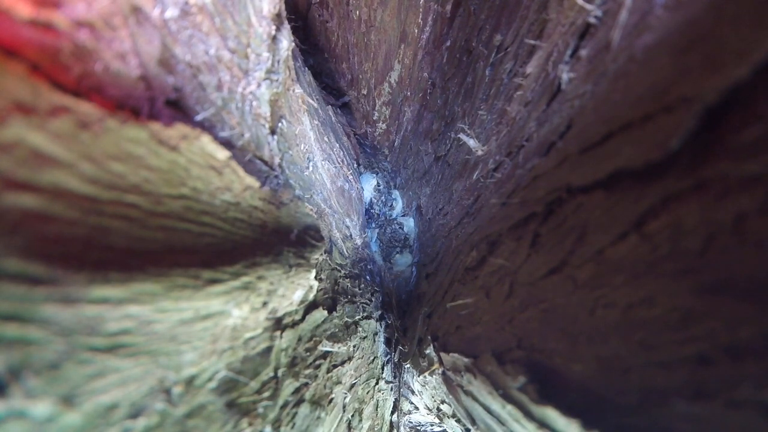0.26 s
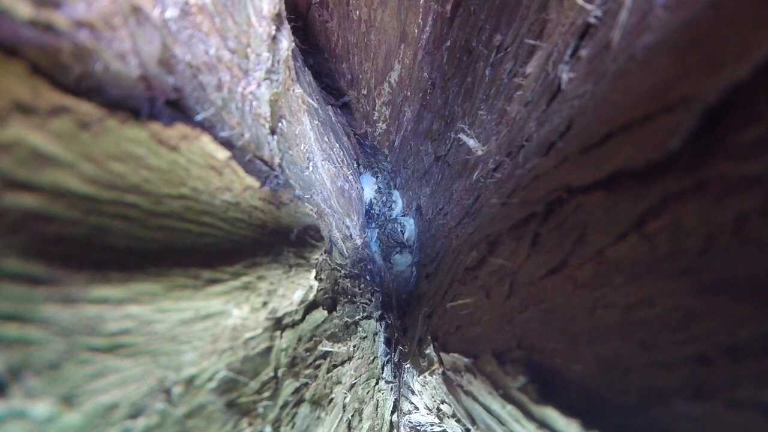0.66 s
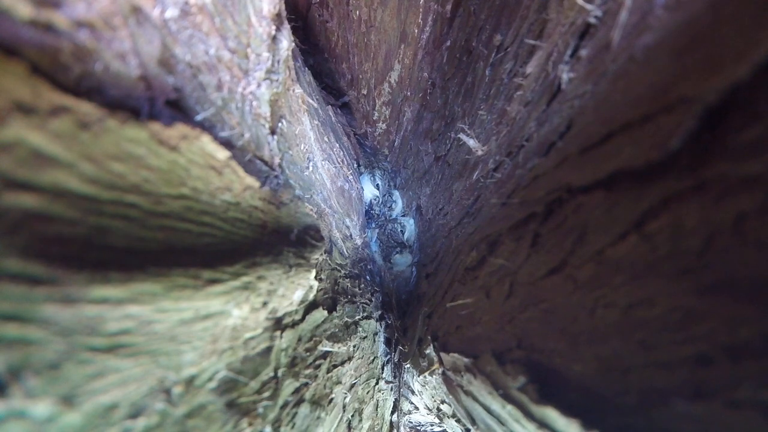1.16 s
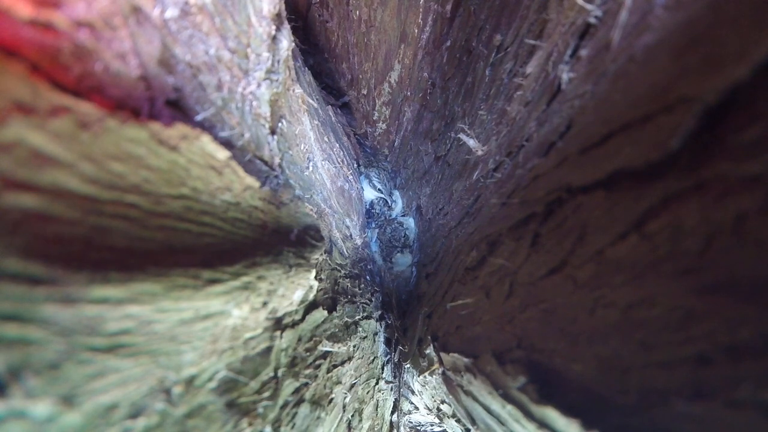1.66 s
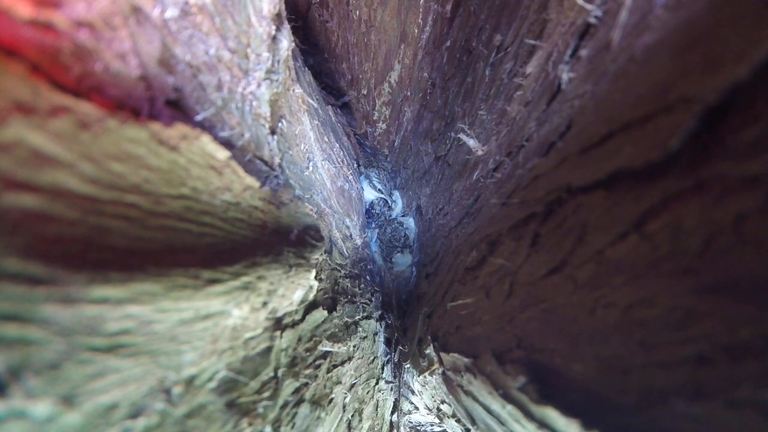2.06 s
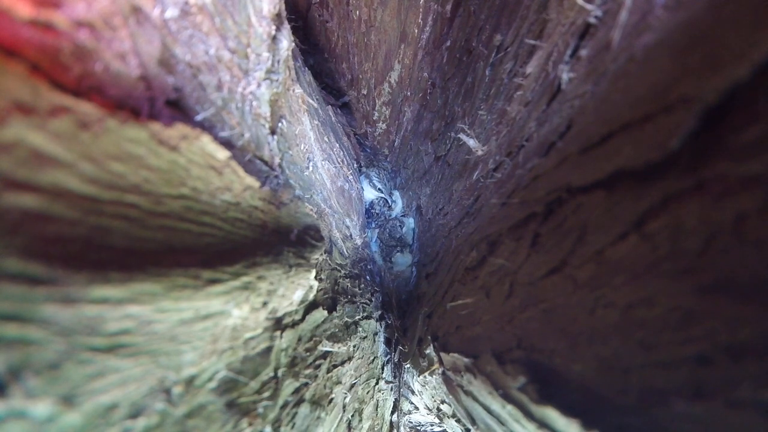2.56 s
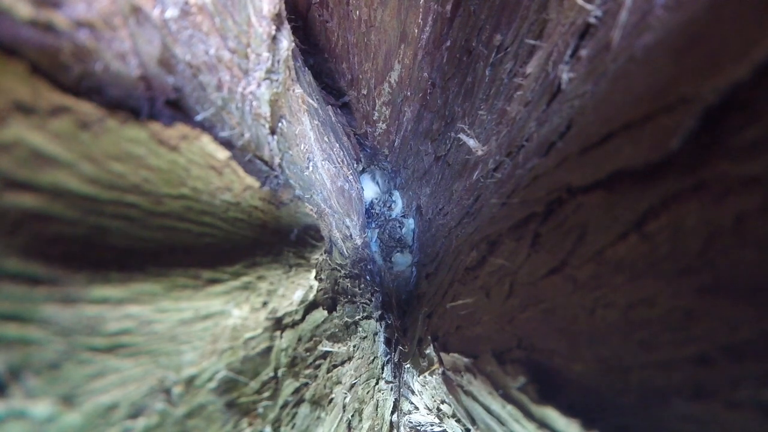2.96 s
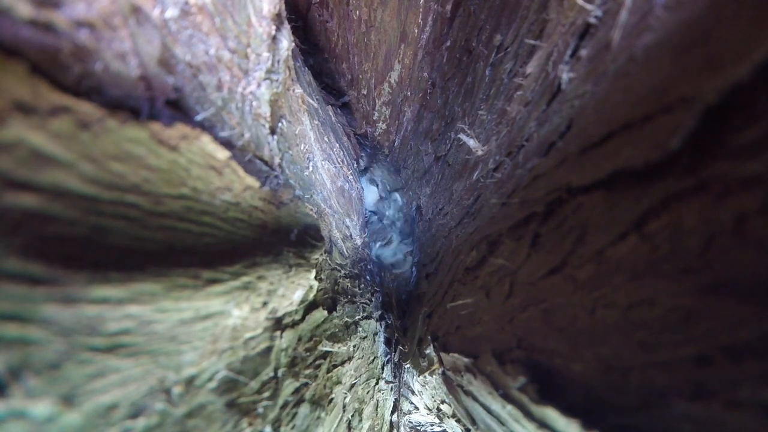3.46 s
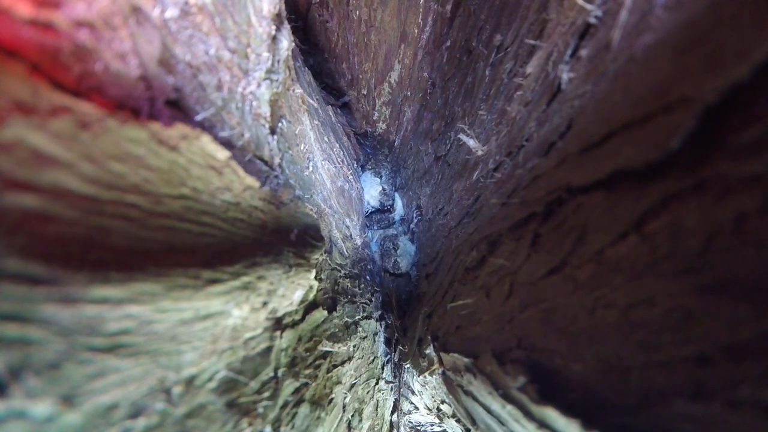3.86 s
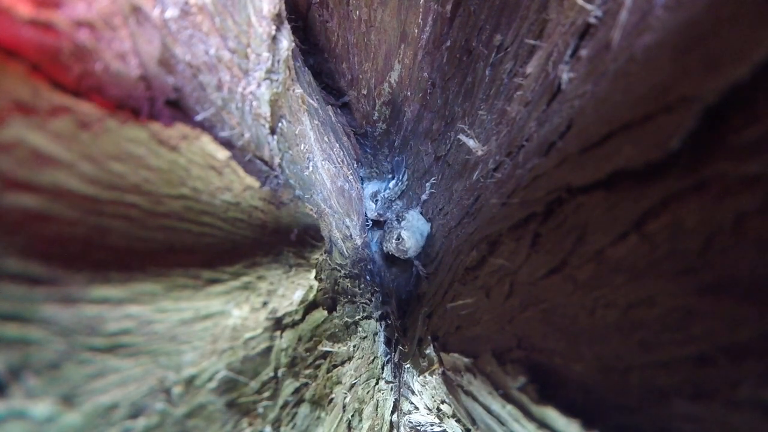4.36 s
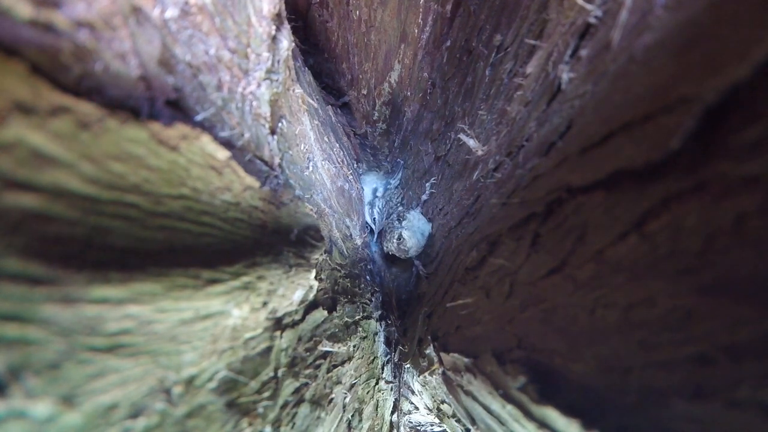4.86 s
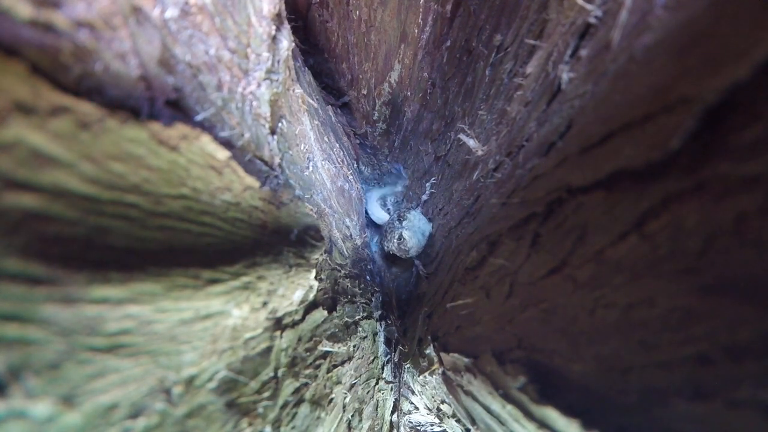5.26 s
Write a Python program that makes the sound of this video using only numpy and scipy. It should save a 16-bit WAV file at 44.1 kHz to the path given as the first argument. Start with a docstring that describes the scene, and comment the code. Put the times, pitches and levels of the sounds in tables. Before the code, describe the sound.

A quiet woodland hush with a faint, wavering low drone and distant whistling songbirds. Close up, claws tick on bark at 0.1 s and a thin begging call near 7 kHz quivers from 0.2 to 0.5 s. At about 0.95 s a nearer bird chips and swoops downward; a loud, pulsing begging call follows at 1.1 s, with soft dull bumps and low gusts until 2 s. More throbbing calls break into pips at 1.5, 2.1 and 2.5-2.9 s, as dry scratches grow denser from 2.4 s. At 3.5 s wings flutter against the microphone with sharp wooden knocks, then short bright squeals at 3.65 s. A stronger flurry thumps at 4.13-4.3 s. Calls become faint, nest lining rustles and ticks, a crisp scratch snaps at 4.8 s, a far bird trills quickly upward from 4.83 to 5.5 s, and wings and knocks return around 5.45 s.

```python
"""Woodland hush, a low wavering drone and far songbirds open: filtered noise, a sine and gliding whistles.
Claws soon scratch bark in noise bursts; treecreeper nestlings beg in a cleft of a tree, thin whistles
near 7 kHz that throb, often into pips. At 1 s a nearer bird chips and swoops; soft bumps and gusts follow.
From 3.5 s the parent flutters its wings close to the microphone and knocks against the wood (brushed noise,
air pulses, housing rings); smooth squeals greet the food, then the lining rustles more and a far bird trills."""
import sys
import numpy as np
from scipy import signal
from scipy.fft import rfft, irfft, next_fast_len
from scipy.io import wavfile
from scipy.ndimage import uniform_filter1d, map_coordinates

SR = 44100
rng = np.random.default_rng(int(sys.argv[2]) if len(sys.argv) > 2 else 0)


def store_pcm(level_fs):
    """Save levels as 16-bit WAV."""
    pcm = np.round(np.clip(level_fs, -1, 1) * 32767).astype(np.int16)
    wavfile.write(sys.argv[1], SR, np.atleast_2d(pcm).T)


N = 242991

# Noise colours. Each row: frequency in Hz, relative density in dB; the noise is then scaled to rms 1.
HUSH_SPECTRUM = [(60, -4), (160, -13), (290, -10.5), (600, -21.5), (1120, -13), (1500, -24.5),
                 (2050, -21.5), (3000, -29.5), (5500, -32.5), (6600, -22.5), (8200, -30.5), (9600, -43.5),
                 (12500, -34.5), (15000, -64)]
RUMBLE_SPECTRUM = [(12, -4.5), (28, -0.5), (55, -1), (90, -12.5), (180, -26), (500, -71)]
RUSTLE_SPECTRUM = [(120, -3.5), (200, -20.5), (290, -2), (400, -14), (480, -10), (700, -24), (2000, -20.5),
                   (3000, -24.5), (6500, -25.5), (9000, -33), (13000, -66.5)]
BARK_SPECTRUM = [(1200, -18.5), (2300, -28), (3200, -6), (4600, 2.5), (5500, -0.5), (6500, 10), (7400, -7),
                 (9000, -17), (12500, -28), (15000, -50.5)]
KNOCK_SPECTRUM = [(100, -36), (300, 7.5), (700, -9), (1200, -4.5), (2300, 0.5), (3800, -10), (8000, -60)]
FEATHER_SPECTRUM = [(60, -2), (125, 6), (185, -15), (285, 3.5), (380, -2.5), (470, 0), (750, -21),
                    (1250, -8), (1550, -14), (2200, -13), (3300, -20), (5100, -22.5), (6400, -18.5),
                    (7600, -33), (9000, -38), (14000, -55)]

# Stirring air, growing as the parent comes near. Each row: time in seconds, level in dB before layer gains.
STIRRING_AIR = [(0, -74), (2.3, -68), (2.9, -54), (3.8, -51.5), (4.45, -46.5), (5.5, -44)]
# Gusts on the microphone. Each row: start in seconds, length in seconds, level in dB before layer gains.
GUSTS = [(1.095, 0.41, -46.5), (1.487, 0.23, -47.5)]
GUST_ATTACK_S, GUST_FADE_DB = 0.016, 17.5
# Litter shaken by each flutter. Each row: middle in seconds, level in dB before layer gains.
LITTER_SHAKES = [(3.55, -54), (4.215, -48), (5.48, -49)]
SHAKE_SIGMA_S = 0.098
JOSTLE_START_S, JOSTLE_DB = 4.3, -60  # after the feed the chicks keep shifting in the lining
# Far drone's pitch. Each row: time in seconds, frequency in Hz.
DRONE_PITCH = [(0, 101.4), (.35, 97.5), (.55, 83.4), (.8, 107.2), (1.1, 88), (1.5, 93), (1.72, 70.5),
               (2, 93.2), (2.3, 81.3), (2.7, 89.3), (3.2, 82.1)]
# Far drone's level, in the end receding. Each row: time in seconds, level in dB.
DRONE_LEVEL = [(0, -59.5), (1.2, -57.5), (2.4, -58), (3.6, -63)]

# Far songbirds' notes, levels before the distance gain.
# Each row: start in seconds, length in seconds, pitch in Hz, slide in Hz, level in dB.
SONG_NOTES = [(0, 0.148, 2110, 140, -54), (0.217, 0.12, 2510, 567, -61.5), (0.32, 0.11, 5200, -220, -63),
              (0.379, .03, 2720, 250, -60), (0.472, 0.1, 2300, -20, -64), (0.521, .2, 3580, -280, -64.5),
              (0.748, .1, 2010, 21, -61), (0.641, 0.25, 2564, 190, -61.5),
              (0.917, 0.043, 2420, -300, -55.5), (0.956, 0.093, 2080, 244, -53.5),
              (1.3, 0.13, 1854, -40, -62), (1.504, 0.15, 3470, -47, -66), (2.572, 0.043, 4664, -380, -44),
              (2.617, 0.24, 4335, 58.5, -55), (2.79, 0.15, 5780, 154, -58.5), (2.989, .08, 2140, -100, -62),
              (3.002, .06, 5820, 148, -60), (3.12, 0.085, 5700, 79, -57.5), (3.139, 0.079, 1823, -77, -57),
              (3.288, 0.105, 5660, 160, -58), (3.43, .06, 5590, 50, -58), (3.8, .08, 4190, -22, -60),
              (3.874, 0.0077, 3730, -190, -47.5), (3.999, 0.076, 4070, 30, -63),
              (4.302, 0.024, 3740, -280, -49.5), (4.326, 0.18, 2143, -210, -54),
              (4.376, 0.013, 4200, -400, -50), (4.421, 0.026, 3620, -200, -51),
              (4.434, 0.03, 4940, -950, -46), (4.609, 0.054, 6690, -1500, -53),
              (4.646, 0.6, 2308, -78.5, -61.5), (5.075, 0.08, 2436, 25, -56.5)]
NOTE_HOLD_SHARE, NOTE_FADE_DB = 0.26, 7.5  # a note holds for this share of its length, then fades
# Two runs of one slur, falling in pitch, levels before the distance gain.
# Each row: start in seconds, period in seconds, slur length in seconds, level in dB.
SLUR_RUNS = [(0.717, .157, .086, -57), (2.87, .1665, .043, -53)]
# Shape of the slur. Each row: share of its length, pitch in Hz, level in dB against its run.
SLUR_SHAPE = [(0, 6150, -16), (.62, 5230, 1), (.82, 4490, 7), (1, 4060, -7)]
TRILL_START_S, TRILL_PERIOD_S = 4.829, .0703

# Claw catches on bark. Each row: time in seconds, level in dB, knock in dB against that level,
# length in seconds of a 30 dB decay, count of light slips on either side.
CLAW_CATCHES = [(0.133, -36, -22, 0.007, 0), (.208, -38.5, -20, 0.011, 0), (.6314, -46, -4, 0.015, 0),
                (1.6872, -34, -30, .023, 2), (1.941, -46, -24, .018, 0), (1.9635, -42.5, -28, 0.019, 0),
                (1.982, -31.5, -15, 0.015, 0), (2.3454, -42.5, -10.5, .02, 0), (2.388, -44, -22, 0.026, 0),
                (2.401, -28.5, -20, 0.02, 1), (2.621, -42, -25, 0.014, 0), (2.636, -39.5, -25, .012, 0),
                (2.676, -34.5, -16, 0.038, 0), (2.692, -28, -24, .012, 1), (2.702, -36.5, -21, 0.011, 0),
                (2.748, -32.5, -22, 0.011, 0), (2.9604, -26.5, -12, 0.013, 0),
                (2.9696, -27.5, -12, 0.018, 1), (3.169, -42.5, -22, .02, 0), (3.211, -38, -18, 0.047, 0),
                (3.274, -43, -20, 0.015, 0), (3.4843, -31, 2, 0.0095, 0), (3.490, -31.5, -4, 0.016, 0),
                (3.506, -38, -9, 0.032, 0), (3.55, -25, -7, 0.015, 0), (3.572, -33, -16, 0.017, 0),
                (3.5785, -26, -18, 0.0092, 0), (3.589, -41.5, -14, 0.058, 0), (3.6165, -36, -10, 0.035, 0),
                (3.643, -43, 2, 0.028, 0), (3.666, -33, -27, 0.015, 0), (3.7052, -32.5, -6.5, 0.025, 0),
                (3.738, -36, -25, .008, 0), (3.993, -32.5, -25, 0.0091, 0), (4.111, -34, -22, 0.014, 0),
                (4.121, -30.5, -27, .012, 0), (4.124, -31, -17, .014, 0), (4.265, -36, 5, 0.011, 0),
                (4.295, -33, -16, 0.0097, 0), (4.3, -32, -16, 0.012, 0), (4.4807, -35.5, -8.5, 0.028, 1),
                (4.792, -20, -22, .009, 0), (4.808, -33.5, -9.5, 0.024, 0), (4.89, -42, -14, .02, 1),
                (5.088, -38, -8, .014, 0), (5.121, -37, -8, 0.017, 0), (5.359, -35, -18, 0.012, 0)]
SLIP_GAP_S, SLIP_SCATTER_SHARE, SLIP_DB = 0.015, 0.089, -13.5  # level is against the catch
# Loose bark flakes flicked by a claw. Each row: time in seconds, pitch in Hz, level in dB.
BARK_FLAKES = [(.137, 4200, -41), (2.403, 4750, -30), (2.973, 2500, -37), (3.487, 2400, -36),
               (4.811, 2000, -39), (5.089, 1130, -36)]

# Begging calls. Each row: start in seconds, end in seconds, throb period in seconds, pitch in Hz,
# pitch fall in Hz, level in dB, swell in seconds, fade in dB, pitch swing in Hz,
# place of the pitch crest in a throb from 0 to 1, first choke, last choke; over 1 leaves silent gaps.
BEGGING_CALLS = [ (.195, .545, 0.038, 7200, 416, -39, .08, -4, 176, .85, .12, 2.22),
                 (1.011, 1.126, 0.032, 7420, -84.5, -41, .0045, -2.5, 220, 0.8, 0.6, 0.9),
                 (1.110, 1.324, .034, 7455, 90, -26.6, .008, 5, 150, .75, .3, 2.6),
                 (1.292, 1.407, .029, 8060, 201, -46, .015, 7, 100, .5, 6.5, 6.5),
                 (1.484, 1.792, 0.04, 7210, 302, -39, 0.046, 2, 170, 0.92, .046, 0.56),
                 (2.068, 2.284, 0.036, 7260, 254, -37.5, .003, 2.5, 300, .78, 1.1, 6.5),
                 (2.521, 2.882, 0.041, 7140, 483, -41, .055, 7.5, 202, 0.8, 0.18, 4.7),
                 (2.58, 2.629, 0.042, 7420, -59, -38, .012, 6, 100, 0.73, .2, .5),
                 (2.627, 2.930, .0345, 7420, 100, -27.3, .008, 8.5, 170, .78, .1, 3.8),
                 (3.135, 3.201, 0.032, 7800, 52, -54.5, .004, -4, 98.5, 0.7, 6.2, 1.4),
                 (3.204, 3.431, 0.032, 7943, 228, -36, 0.045, 9.5, 150, 0.37, 1.25, 1.6),
                 (3.301, 3.547, .031, 7600, 400, -45.5, 0.097, 7.5, 600, 0.69, 0.4, 1.1),
                 (3.866, 4.148, 0.034, 7250, 450, -44.5, 0.11, 9, 725, 0.85, .65, 0.74),
                 (4.290, 4.481, 0.036, 7200, 389, -62.5, 0.015, -14.5, 520, 0, 0.49, 1),
                 (5.040, 5.385, 0.032, 7170, 560, -57, 0.11, -4.5, 523, .05, 0.59, 1.24), ]
SWELL_DB, FALL_POWER, FADE_POWER = 17.5, 2.3, 2.54  # powers above 1: fall and fade speed up

# Nearer bird's chip. Each row: time in seconds, pitch in Hz, level in dB.
NEAR_CHIP = [(.941, 5750, -50), (.948, 6300, -48), (.959, 6400, -37.5), (.965, 6080, -50),
             (.981, 6050, -52), (.988, 5460, -53)]
# Its swoops, one list a note. Each row: time in seconds, pitch in Hz, level in dB.
NEAR_SWOOPS = [
    [(1.001, 5540, -60), (1.008, 5750, -53), (1.014, 5550, -56)],
    [(1.014, 5030, -57), (1.021, 4110, -46.5), (1.027, 4200, -47.5), (1.034, 4850, -53), (1.040, 5730, -61)],
    [(1.042, 5200, -56), (1.048, 4070, -45.5), (1.054, 3235, -54), (1.066, 3260, -46), (1.074, 3080, -46),
     (1.084, 3000, -50), (1.110, 2540, -58)],
]
# Soft bumps on the microphone's housing. Each row: time in seconds, level in dB.
HOUSING_BUMPS = [(1.113, -49), (1.178, -44), (1.199, -40.5), (1.487, -47), (1.54, -46), (1.575, -40.5),
                 (1.615, -41.5), (1.665, -44.5), (1.995, -44)]

# Wing strokes. Each row: time in seconds, swish in dB, air push in dB, swish sigma in seconds.
WING_STROKES = [(3.489, -44.5, -47, .005), (3.508, -46, -40, .005), (3.528, -39, -46, 0.0076),
                (3.556, -32.5, -33, 0.0032), (3.577, -46.5, -48, 0.0049), (4.13, -38.5, -46, 0.0022),
                (4.141, -38, -32.5, 0.0019), (4.167, -32, -51, 0.0019), (4.1772, -27, -23, 0.0038),
                (4.196, -35, -45, 0.0028), (4.212, -27, -25, 0.0046), (4.251, -30.5, -22, 0.0055),
                (4.29, -39.5, -31, 0.0044), (5.295, -42, -33, 0.0043), (5.431, -35, -35, .004),
                (5.451, -36, -42, 0.0016), (5.461, -26, -30, 0.0033), (5.482, -35, -44, 0.0032),
                (5.497, -26, -28.5, 0.004)]
# Short damped resonances of the microphone's housing, rung by strokes and taps.
# Each row: frequency in Hz, relative level in dB, t60 in seconds.
HOUSING_MODES = [(285, -16, 0.052), (463, -11.5, 0.024), (774, -8, 0.0096), (1273, -10, 0.011),
                 (2250, 0.5, 0.0026), (3440, -5, 0.0021)]
# Parent's sharp bumps against the wood. Each row: time in seconds, peak of the ring in dB.
WOOD_TAPS = [(3.520, -30), (3.5545, -17), (3.5797, -29), (4.1635, -26), (4.2145, -17), (4.253, -24),
             (4.7938, -29), (5.4605, -22), (5.499, -24)]
# Squeals as the food arrives. Each row: start in seconds, length in seconds, first pitch in Hz,
# middle pitch in Hz, last pitch in Hz, level in dB.
FOOD_SQUEALS = [(3.648, 0.025, 6900, 7910, 8170, -22.5), (3.657, .045, 6560, 7800, 7970, -27),
                (3.706, 0.022, 7600, 7460, 7520, -33.5), (4.484, 0.063, 6520, 5850, 5560, -44.5),
                (5.372, 0.0078, 6750, 6480, 6350, -39.5), (5.393, 0.013, 6500, 6300, 5900, -39.5)]
SQUEAL_EDGE_DB = -7  # ends against the middle

# Decay of the woods' echo. Each row: frequency in Hz, t60 in seconds.
WOODS_DECAY = [(500, 0.22), (4000, 0.58), (9000, 0.1)]
NEST_ECHO_DB = -35
TOP_HZ = 14200


def amp(db):
    """Decibels to gain."""
    return 10 ** (np.asarray(db) / 20)


def unit(x):
    """Scale to rms 1."""
    return x / np.sqrt(np.mean(x ** 2) + 1e-20)


def along(points, hz):
    """Interpolate (Hz, value) points on a log frequency axis."""
    f, v = np.transpose(points)
    return np.interp(np.log(hz + 1), np.log(f + 1), v)


def curves(rows, t):
    """Each column after the time, interpolated at times t."""
    s, *cols = np.transpose(rows)
    return [np.interp(t, s, c) for c in cols]


def span(rows):
    """Sample times from the first row to the last, at least 5 ms."""
    return np.arange(rows[0][0], max(rows[-1][0], rows[0][0] + .005), 1 / SR)


def wobble(rate_hz, t):
    """A smooth random curve with rate_hz knots a second."""
    knots = rng.standard_normal(int(N * rate_hz / SR) + 4)
    return map_coordinates(knots, [t * rate_hz], mode="nearest")


def filtered(x, response):
    """Apply a zero-phase gain, a function of frequency in Hz."""
    m = next_fast_len(N + SR // 4)
    return irfft(rfft(x, m) * response(np.fft.rfftfreq(m, 1 / SR)), m)[:N]


def noise(spectrum):
    """Coloured noise of rms 1."""
    return unit(filtered(rng.standard_normal(N), lambda hz: amp(along(spectrum, hz))))


def add(track, s, sound):
    """Mix a sound in at s seconds."""
    start = int(np.clip(round(s * SR), 0, N))
    track[start:start + len(sound)] += sound[:N - start]


def whistle(t, hz, gain, jitter_hz, flutter_db):
    """A syrinx sings one nearly pure line, slightly unsteady in pitch and strength."""
    phase = 2 * np.pi * np.cumsum(hz + jitter_hz * wobble(220, t)) / SR
    edge = np.clip(np.minimum(t - t[0], t[-1] - t) / 0.0016, 0, 1)
    soft = uniform_filter1d(gain * edge, size=64, mode="constant")
    return np.sqrt(2) * soft * amp(flutter_db * wobble(160, t)) * np.sin(phase)


def glides(notes, jitter_hz, flutter_db):
    """Whistled notes that slide through their pitches and levels."""
    out = np.zeros(N)
    for note in notes:
        t = span(note)
        hz, db = curves(note, t)
        add(out, t[0], whistle(t, hz, amp(db), jitter_hz, flutter_db))
    return out


def stirring_air(t):
    """Gain of the moving air: its slow growth plus fading gusts."""
    air = amp(curves(STIRRING_AIR, t)[0])
    for s, length_s, db in GUSTS:
        window = np.clip(np.minimum(t - s, s + length_s - t) / GUST_ATTACK_S, 0, 1)
        air = air + window * amp(db - GUST_FADE_DB * np.clip((t - s) / length_s, 0, 1))
    return air


def far_drone(t):
    """One sine wavers in pitch and level."""
    hz = curves(DRONE_PITCH, t)[0]
    db = curves(DRONE_LEVEL, t)[0]
    gain = np.sqrt(2) * amp(db + 2.1 * wobble(12, t))
    return gain * np.sin(2 * np.pi * np.cumsum(hz + 1.9 * wobble(23, t)) / SR)


def background(hush_db=-55, rumble_db=1, rustle_db=-13, lumps_db=3.5):
    """Steady woodland hush, stirring air, nest litter moved by air, wings and chicks, and a far drone."""
    t = np.arange(N) / SR
    air = stirring_air(t)
    shake = sum(amp(db) * np.exp(-((t - s) / SHAKE_SIGMA_S) ** 2 / 2) for s, db in LITTER_SHAKES)
    jostle = amp(JOSTLE_DB) * (t > JOSTLE_START_S)
    rumble = air * amp(rumble_db + 2.1 * wobble(13, t)) * noise(RUMBLE_SPECTRUM)
    stirred = np.hypot(air * amp(rustle_db) + shake, jostle)
    rustle = stirred * amp(lumps_db * wobble(45, t)) * noise(RUSTLE_SPECTRUM)
    return amp(hush_db) * noise(HUSH_SPECTRUM) + rumble + rustle + far_drone(t)


def trill(length_s=.028, low_hz=3700, high_hz=5400, db=-44, count=10):
    """A far bird repeats one quick upward note."""
    out = np.zeros(N)
    for k in range(count):
        t = TRILL_START_S + k * TRILL_PERIOD_S + np.arange(0, length_s, 1 / SR)
        u = np.linspace(0, 1, len(t))
        hz = low_hz + (high_hz - low_hz) * u ** 1.226
        add(out, t[0], whistle(t, hz, amp(db) * np.sin(np.pi * u) ** 2, jitter_hz=21, flutter_db=1.0))
    return out


def songbirds(slurs_per_run=4):
    """Far syrinxes whistle sliding notes, runs of slurs and a trill."""
    notes = []
    for s, length_s, hz, slide_hz, db in SONG_NOTES:
        held = (s + NOTE_HOLD_SHARE * length_s, hz + NOTE_HOLD_SHARE * slide_hz, db)
        notes.append([(s, hz, db), held, (s + length_s, hz + slide_hz, db - NOTE_FADE_DB)])
    for s, period_s, length_s, db in SLUR_RUNS:
        for k in range(slurs_per_run):
            start_s = s + k * period_s
            notes.append([(start_s + share * length_s, hz, db + rise_db)
                          for share, hz, rise_db in SLUR_SHAPE])
    return glides(notes, jitter_hz=35.2, flutter_db=2.0) + trill()


def litter(start_s, per_second, db, spread_db, decay_s):
    """Dry nest lining ticks at random times as the chicks move: short decaying noise."""
    ticks = np.zeros(N)
    t = np.arange(SR // 100) / SR
    draws = rng.exponential(size=(200, 2))
    times_s = start_s + np.cumsum(draws[:, 0]) / per_second
    sizes = np.minimum(draws[:, 1], 3)
    for s, size in zip(times_s, sizes):
        add(ticks, s, amp(db + spread_db * size) * np.exp(-t / decay_s))
    return ticks * noise(BARK_SPECTRUM)


def catches():
    """Each firm catch with its lighter slips before and after."""
    for s, db, wood_db, length_s, count in CLAW_CATCHES:
        yield s, db, wood_db, length_s
        for k in range(round(count)):
            for side in (-1, 1):
                gap_s = SLIP_GAP_S * (k + 1 + SLIP_SCATTER_SHARE * rng.standard_normal())
                yield s + side * gap_s, db + SLIP_DB, wood_db, length_s


def claws(rasp_db=1, knock_db=0, grain_db=5.0, attack_s=0.003):
    """A claw catches, then skids over the bark in tiny slips; the wood knocks beneath it."""
    rasp, knock = np.zeros(N), np.zeros(N)
    t = np.arange(SR // 8) / SR
    for s, db, wood_db, length_s in catches():
        skid = (1 - np.exp(-t / attack_s)) * amp(db - 30 * t / max(length_s, attack_s))
        add(rasp, s, skid)
        add(knock, s, skid * amp(wood_db))
    slips = unit(amp(grain_db * wobble(900, np.arange(N) / SR)))
    rasping = amp(rasp_db) * rasp * noise(BARK_SPECTRUM)
    return slips * (rasping + amp(knock_db) * knock * noise(KNOCK_SPECTRUM))


def flakes(t60_s=0.026, attack_s=0.00066, rough_rad=0.25):
    """A flake rings briefly at its own note, roughened by random phase."""
    out = np.zeros(N)
    t = np.arange(SR // 25) / SR
    for s, hz, db in BARK_FLAKES:
        tone = np.sin(2 * np.pi * hz * t + rough_rad * wobble(1000, t))
        add(out, s, amp(db - 60 * t / t60_s) * (1 - np.exp(-t / attack_s)) * tone)
    return out


def begging(sharpness=1.4, edge_power=2.6, sag_hz=170, snap_on=0.78, snap_off=0.34):
    """Each call swells and throbs 24 to 34 times a second; choked airflow deepens most throbs, often to pips."""
    out = np.zeros(N)
    for (start, end, period, hz, fall_hz, db, swell, fade_db, swing_hz, crest,
         first_choke, last_choke) in BEGGING_CALLS:
        t = np.arange(start, end, 1 / SR)
        u = np.linspace(0, 1, len(t))
        swell_db = SWELL_DB * np.clip(1 - (t - start) / swell, 0, 1) ** 2
        level_db = db - swell_db - fade_db * u ** FADE_POWER
        choke = first_choke * (last_choke / first_choke) ** u
        cycle = (t - end) / period % 1  # a call ends with a whole throb
        airflow = np.clip(1 - choke * np.abs(2 * cycle - 1) ** edge_power, 0, 1)
        abruptness = np.where(cycle < .5, snap_on, snap_off)  # pips start more abruptly than they stop
        voicing = airflow ** (1 / np.maximum(1, choke) ** abruptness)
        # pitch flicks up once a throb, further in deep throbs, and sags as the air runs out
        flick = np.exp(sharpness * (np.cos(2 * np.pi * (cycle - crest)) - 1))
        swing = swing_hz * np.minimum(1, choke) ** .5 * (flick - flick.mean())
        pitch_hz = hz - fall_hz * u ** FALL_POWER + swing - sag_hz * (1 - airflow) ** 2
        add(out, t[0], whistle(t, pitch_hz, amp(level_db) * voicing, jitter_hz=26.7, flutter_db=1.17))
    return out


def near_bird():
    """One nearer syrinx whistles a chip, then swoops."""
    return glides([NEAR_CHIP] + NEAR_SWOOPS, jitter_hz=35, flutter_db=-1)


def bumps(hz=260, t60_s=0.069, attack_s=.004):
    """Each bump leaves a short dull ring, its pitch scattered at random."""
    out = np.zeros(N)
    t = np.arange(SR // 8) / SR
    for s, db in HOUSING_BUMPS:
        tone = np.sin(2 * np.pi * hz * (1 + 0.1 * rng.standard_normal()) * t)
        add(out, s, amp(db - 60 * t / t60_s) * (1 - np.exp(-t / attack_s)) * tone)
    return out


def housing_ring(attack_s=0.00046):
    """The microphone housing's short damped ring: decaying modes, randomly balanced, peak 1."""
    t = np.arange(SR // 12) / SR
    chance_db = rng.normal(0, 1.5, len(HOUSING_MODES))
    out = np.zeros(len(t))
    for (hz, db, t60_s), extra_db in zip(HOUSING_MODES, chance_db):
        out += amp(db + extra_db - 60 * t / t60_s) * np.cos(2 * np.pi * hz * t)
    out = out * (1 - np.exp(-t / attack_s))
    return out / np.abs(out).max()


def wings(push_width_s=0.0064, grain_db=3.3, wake_db=-22, wake_s=0.0081, housing_db=-7):
    """Each stroke brushes feathers along the cleft, pushes air at the microphone and rings its housing."""
    swish, push = np.zeros(N), np.zeros(N)
    t = np.arange(-SR // 10, SR // 10) / SR
    for s, db, push_db, sigma_s in WING_STROKES:
        brush = np.exp(-(t / sigma_s) ** 2 / 2) + amp(wake_db) * np.exp(-np.abs(t) / wake_s)
        add(swish, s + t[0], amp(db) * brush)
        u = (t / push_width_s) ** 2
        add(push, s + t[0], amp(push_db) * (1 - u) * np.exp(-u / 2))  # pressure between two suctions
    barbs = swish * unit(amp(grain_db * wobble(1400, np.arange(N) / SR)))
    ring = housing_ring()
    housing = signal.fftconvolve(barbs * rng.standard_normal(N), ring / np.linalg.norm(ring))[:N]
    return barbs * noise(FEATHER_SPECTRUM) + amp(housing_db) * housing + push


def taps(crack_db=-14, crack_t60_s=0.0022):
    """Each tap rings the microphone's housing under a short dry crack."""
    body, crack = np.zeros(N), np.zeros(N)
    t = np.arange(SR // 50) / SR
    for s, db in WOOD_TAPS:
        add(body, s, amp(db) * housing_ring())
        add(crack, s, amp(db + crack_db - 60 * t / crack_t60_s))
    return body + crack * noise(BARK_SPECTRUM)


def squeals():
    """Each whistled squeal bends through three pitches and is loudest in the middle."""
    notes = []
    for s, length_s, first_hz, middle_hz, last_hz, db in FOOD_SQUEALS:
        edge_db = db + SQUEAL_EDGE_DB
        notes.append([(s, first_hz, edge_db), (s + length_s / 2, middle_hz, db),
                      (s + length_s, last_hz, edge_db)])
    return glides(notes, jitter_hz=25, flutter_db=-1.5)


def woods(x):
    """Trunks scatter a thin tail, each band with its own decay, fastest in the treble."""
    hz, t, z = signal.stft(rng.standard_normal(SR // 2), SR, nperseg=256)
    decay = amp(-60 * t / along(WOODS_DECAY, hz)[:, None])
    tail = signal.istft(z * decay, SR, nperseg=256)[1]
    return signal.fftconvolve(x, tail / np.linalg.norm(tail))[:N]


def scene():
    """The nest is close and nearly dry, its lining busier after the feed; songbirds arrive through trees."""
    lining = litter(0, per_second=27, db=-61.5, spread_db=2.0, decay_s=0.0021)
    lining = lining + litter(JOSTLE_START_S, per_second=70, db=-53.5, spread_db=5.0, decay_s=0.00098)
    nest = begging() + squeals() + claws() + taps() + flakes() + wings() + lining
    far, near = songbirds(), near_bird()
    echo = woods(amp(-12.5) * far + amp(-24) * near + amp(NEST_ECHO_DB) * nest)
    return (nest + near + amp(-5.5) * far + echo + background() + bumps())[None]


def record(dry):
    """The recorder cuts steeply above its band limit."""
    return filtered(dry[0], lambda hz: 1 / (1 + (hz / TOP_HZ) ** 80))[None]


dry = scene()
out = record(dry)
store_pcm(out)
```